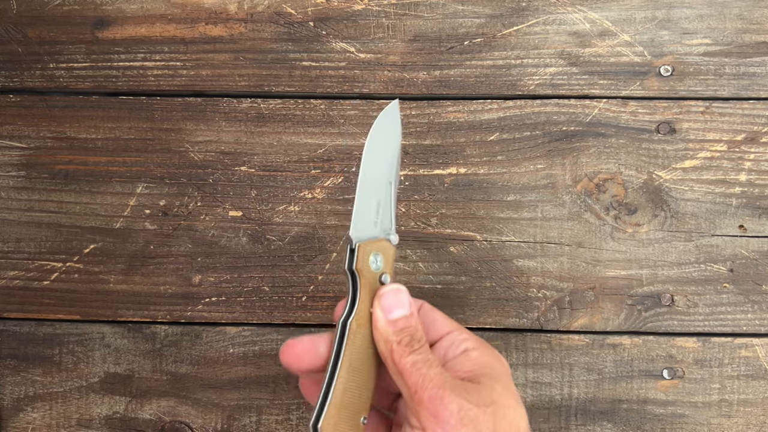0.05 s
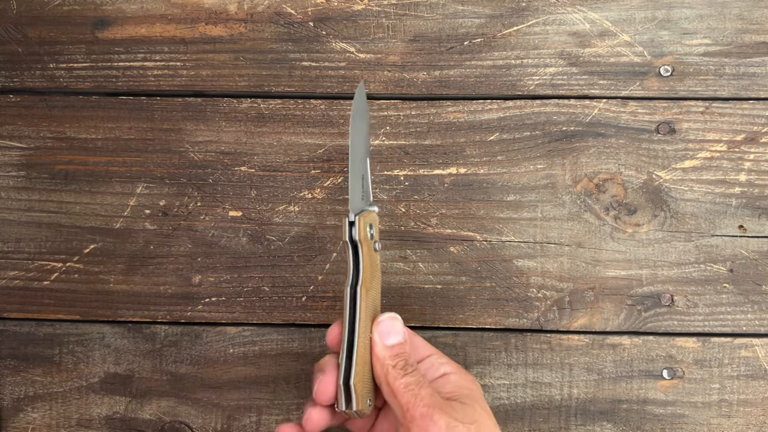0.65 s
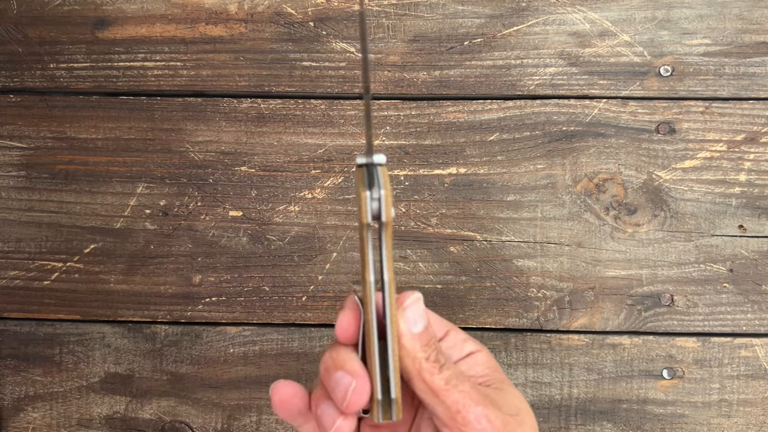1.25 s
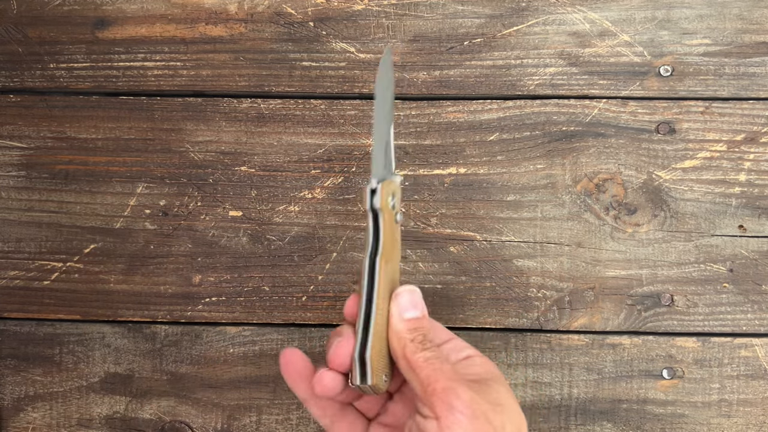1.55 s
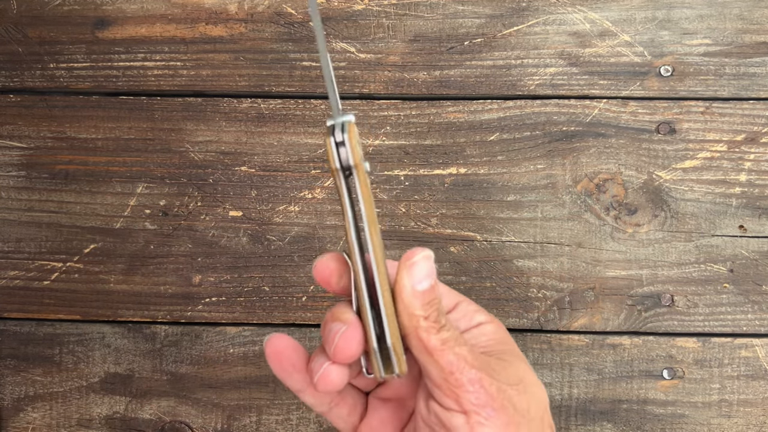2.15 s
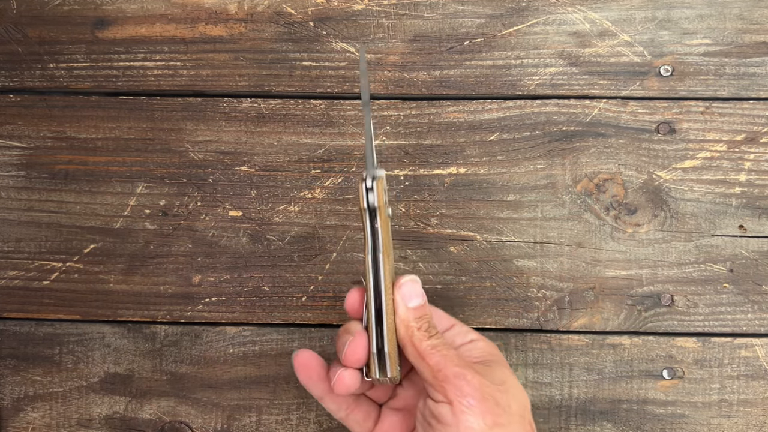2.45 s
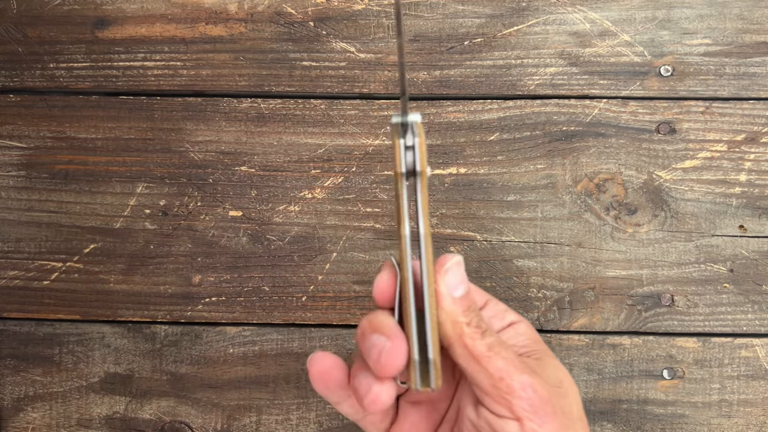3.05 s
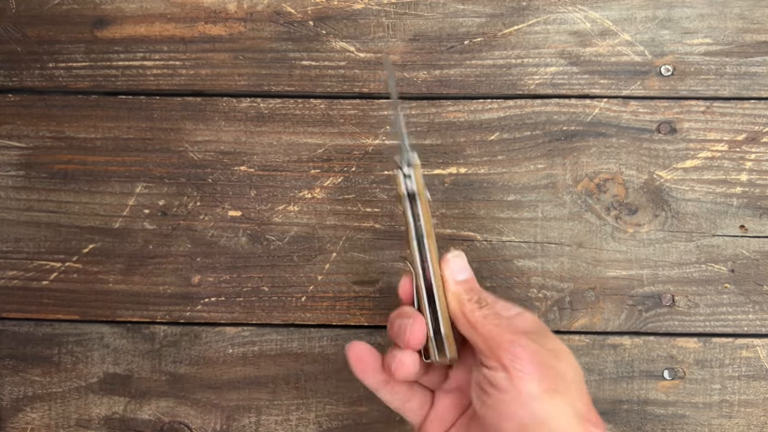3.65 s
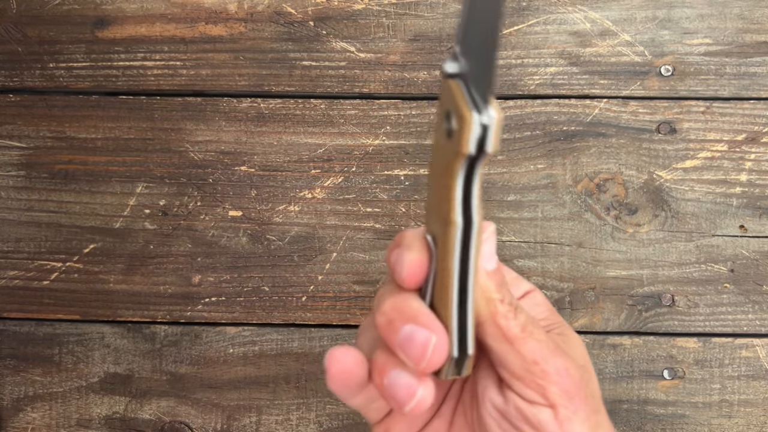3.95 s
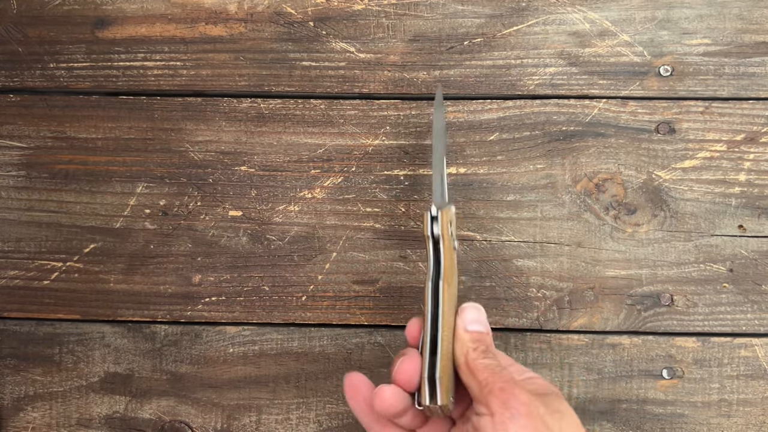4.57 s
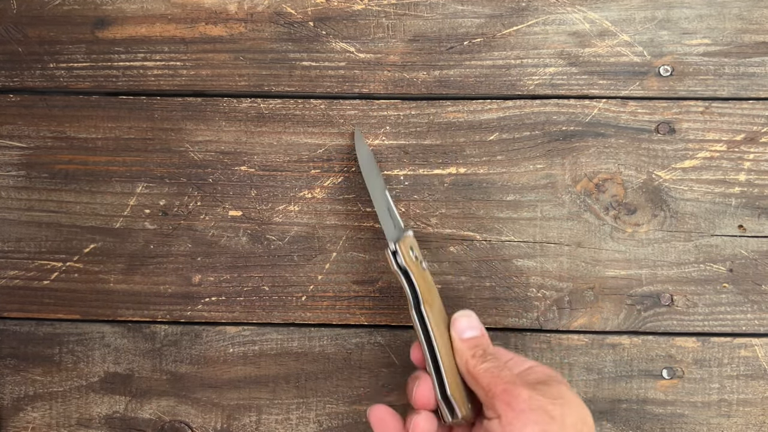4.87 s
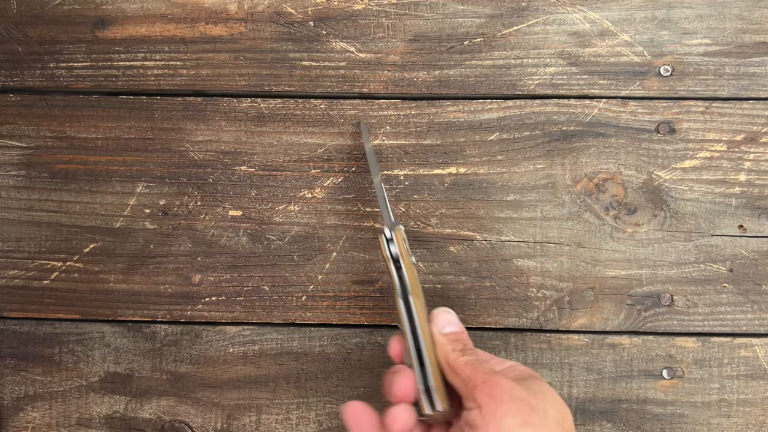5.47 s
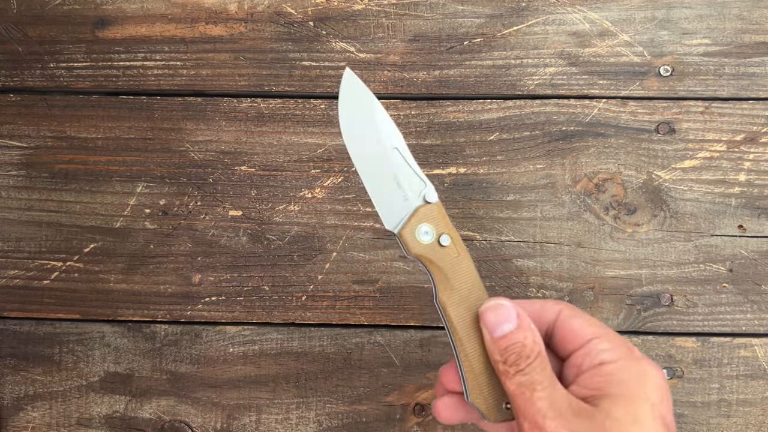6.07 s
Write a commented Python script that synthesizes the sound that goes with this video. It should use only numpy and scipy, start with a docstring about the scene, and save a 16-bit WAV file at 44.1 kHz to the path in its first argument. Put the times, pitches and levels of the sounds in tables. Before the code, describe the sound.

The metal spine of a folding knife is knocked against a wooden plank table, close to the microphone in a small, live room. After a second of faint finger movement on the handle, thirteen sharp knocks follow, about two a second and quickening near the end. Each cracks and briefly rings in wood and metal, and some bounce. A very faint hum lies underneath.

```python
"""The spine of a folding knife knocked on a plank table, close to the microphone in a small, live room.
Each blow cracks and sets planks and knife ringing, and some bounce. The microphone input clips for the
first milliseconds, then the room rings out. Underneath lie room tone and a faint hum. Fingers shift on
the handle early on, and three times the hand stops close enough to push air onto the microphone."""
import sys
import numpy as np
from scipy import signal
from scipy.fft import rfft, irfft
from scipy.io import wavfile

SR = 44100
rng = np.random.default_rng(int(sys.argv[2]) if len(sys.argv) > 2 else 0)


def put_to_file(sound):
    """Save the sound as 16-bit audio at rate SR, in the file named by the first command-line argument."""
    columns = np.atleast_2d(sound).T  # one column per channel
    safe = np.clip(columns, -1, 1)
    whole_steps = np.round(safe * 32767)
    wavfile.write(sys.argv[1], SR, whole_steps.astype(np.int16))


N = 278403

# modes of table and knife: pitch_hz, t60_s, gain_at_place_0_db, gain_at_place_1_db, room_share_db
MODES = [(168.7, 0.051, -25, -16, 13), (243, .35, -36.5, -37.5, 24), (373.7, 0.13, -18, -23, 24.5),
         (441, 0.074, -11, -32.5, 11), (541.2, 0.067, -10, -16.5, 7), (591.2, 0.11, -10, -27.5, 25.5),
         (621, 0.37, -27.5, -30.5, 44), (818.6, 0.053, -20.5, -20.5, 7.5), (925, 0.06, -12, -16, 4),
         (954, 0.027, -31, -30.5, 31), (1133, 0.032, -23, -6.5, 14.5), (1311, 0.074, -16.5, -12.5, 21),
         (1408, 0.073, -23, -18.5, 33.5), (1390, 0.2, -13, -19.5, 12.5), (1490, 0.12, -25, -25.5, 33),
         (1380, 0.13, -23.5, -17.5, 15.5), (1890, 0.037, -5.5, -8.5, 6), (1840, 0.033, -17.5, -14.5, 21),
         (1900, 0.2, -10, -9, 7.5), (1983, 0.069, -16.5, -22, 30.5), (2110, 0.045, -13.5, -15.5, 18),
         (2352, 0.061, -14, -13, -2.5), (2435, 0.015, -8.5, -14, 1), (2538, 0.088, -10, -7, 14.5),
         (2740, 0.014, -15.5, -9.5, 5), (3015, 0.05, 4, -12.5, -2), (3017, 0.052, 5, -20, 10),
         (3508, 0.16, -19.5, -15, 13.5), (3540, 0.02, -16, -3.5, 4), (3835, 0.057, -15.5, -8, 10.5),
         (4200, 0.27, -38, -25, 19), (4370, 0.18, -10, -55, 12), (4830, 0.07, -32, -33.5, 31.5),
         (7100, 0.047, -36.5, -36, 44.5)]


def undb(db):
    """Decibels to gain."""
    return 10 ** (np.asarray(db) / 20)


def level(x, db):
    """Scale to an rms level."""
    return x * undb(db) / np.sqrt(np.mean(x ** 2))


def colour(x, gain_at):
    """Filter with a gain given as a function of octaves (log2 Hz)."""
    hz = np.maximum(np.fft.rfftfreq(len(x), 1 / SR), 1)
    return irfft(rfft(x) * gain_at(np.log2(hz)), len(x))


def add(track, sound, start_s):
    """Mix a sound into a track, dropping what falls outside it."""
    start = int(round(start_s * SR))
    lo, hi = max(start, 0), min(start + len(sound), len(track))
    if hi > lo:
        track[lo:hi] += sound[lo - start:hi - start]


def fading_noise(table, noise):
    """Dense resonances: overlapping bands of a noise, each with its own level and decay."""
    hz, db, t60 = np.transpose(table)
    t = np.arange(len(noise)) / SR
    shaped = colour(noise, lambda o: undb(np.interp(o, np.log2(hz), db)))
    bands = (colour(shaped, lambda o: np.interp(o, np.log2(hz), peak)) for peak in np.eye(len(hz)))
    return sum(band * np.exp(-np.log(1000) * t / decay) for band, decay in zip(bands, t60))


def contacts(blow_room_db=0.73, bounce_room_db=-2, bounce_slip=0.24):
    """Blows, then bounces a little further along the spine: start_s, force_db, place, room_share_db."""
    # the spine striking the table: start_s, force_db, place (of contact, 0-1)
    blows = [(-.135, -6, 0.95), (1.0536, -0.5, 0.84), (1.4997, -5.5, 0.62), (1.9242, 2.5, 0.33),
             (2.4336, -1, 0.4), (2.8341, 2, 0.22), (3.321, 3, 0.21), (3.7396, 1.5, 0.17), (4.1381, 2, 0.06),
             (4.5325, -4, 0.82), (4.8888, -6.5, 0.7), (5.2106, 1.5, 0.81), (5.4970, 1.5, 0.69),
             (5.7088, -.5, 0.65)]
    # the blade falling back after some blows: start_s, force_db
    bounces = [(1.0755, -11), (2.8518, -12.5), (3.7560, -12.5), (4.1554, -13), (4.5703, -15), (4.916, -17),
               (5.5156, -13)]
    rows = [(start_s, force_db, place, blow_room_db) for start_s, force_db, place in blows]
    for start_s, force_db in bounces:
        last_place = [place for blow_s, _, place in blows if blow_s < start_s][-1]
        rows.append((start_s, force_db, min(last_place + bounce_slip, 1), bounce_room_db))
    return rows


def mode_gains(place, scatter_db=2.0):
    """How strongly each mode answers depends on where the spine lands."""
    _, _, place_0_db, place_1_db, _ = np.transpose(MODES)
    gain_db = place_0_db + place * (place_1_db - place_0_db)
    return undb(gain_db + scatter_db * rng.standard_normal(len(MODES)))


def grain(end_noises, place, fresh_share=0.79):
    """Fine structure of a response: partly set by the place of contact, mostly new at each blow."""
    angle = place * np.pi / 2
    of_place = np.cos(angle) * end_noises[0] + np.sin(angle) * end_noises[1]
    fresh = rng.standard_normal(len(of_place))
    return np.sqrt(1 - fresh_share) * of_place + np.sqrt(fresh_share) * fresh


def hardness(sound, force_db, pivot_hz=2000):
    """A stronger contact is harder and shorter, and so brighter."""
    tilt_db_per_octave = 0.08 + 0.1247 * force_db
    padded = np.pad(sound, (0, len(sound)))
    tilted = colour(padded, lambda o: undb(tilt_db_per_octave * np.clip(o - np.log2(pivot_hz), -2, 2)))
    return tilted[:len(sound)]


def blow(gains, noise, detune=0.0016, ring_db=2.5):
    """One contact heard close up: a short crack and the ringing modes, which the grip detunes a little."""
    # crack of the many damped modes between the ringing ones: band_hz, gain_db, t60_s
    crack_bands = [(50, -3.5, 0.023), (198, 0, 0.0077), (457, 5.5, 0.017), (860, 10, 0.036),
                   (1560, 12, 0.045), (3420, 18, 0.035), (4180, 14.5, 0.021), (6650, 6.5, 0.016),
                   (9900, 0.5, 0.021), (16100, -10, 0.024)]
    t = np.arange(len(noise)) / SR
    hz, t60, *_ = np.transpose(MODES)
    hz = hz * (1 + detune * rng.standard_normal(len(hz)))
    rings = np.cos(2 * np.pi * np.outer(hz, t)) * np.exp(-np.log(1000) * t / t60[:, None])
    return undb(ring_db) * gains @ rings + fading_noise(crack_bands, noise)


def room(gains, noise, ripple_db, cluster_hz=18, build_s=0.013, far_wall_s=0.022, linger_s=0.2):
    """The room returns a blow from all directions: a wash with a peak at every mode."""
    # reverberation of the small room: band_hz, gain_db, t60_s
    reverb_bands = [(58.5, -10.5, 0.23), (175, -11, 0.29), (352, -6, 0.3), (710, -9.5, 0.32),
                    (1150, -3.5, 0.29), (1890, -2, 0.32), (3640, -0.5, 0.3), (4470, -9, 0.31),
                    (6320, -14, 0.29), (7600, -26, 0.3), (12000, -28.5, 0.15), (16000, -38.5, .17)]
    t = np.arange(len(noise)) / SR
    hz, t60, _, _, room_share_db = np.transpose(MODES)
    # the planks couple, which spreads each mode's energy over a small cluster
    own_width = np.log(1000) / (2 * np.pi * t60)
    half_width = np.hypot(own_width, cluster_hz)
    power = (undb(room_share_db) * gains) ** 2 * own_width / half_width

    def resonances(octave):
        f = 2 ** octave
        peaks = (1 / (1 + ((f[:, None] - hz) / half_width) ** 2)) @ power
        # countless weak modes ripple the treble
        fine_db = np.interp(f, np.linspace(0, SR / 2, len(ripple_db)), ripple_db)
        return np.sqrt(1 + peaks) * undb(fine_db * np.minimum(f / 4000, 1))

    # the wash builds up quickly and swells again when the far walls answer
    swell = (1 - np.exp(-(t / build_s) ** 2)) * np.where(t < far_wall_s, undb(-3), 1)
    # the last reflections, between the hardest walls, die more slowly
    linger = np.sqrt(1 + (t / linger_s) ** 4)
    return fading_noise(reverb_bands, colour(noise, resonances)) * swell * linger


def knife_knocks():
    """Every contact reaches the microphone directly, off nearby surfaces and through the room."""
    # first reflections from nearby surfaces: delay_s, gain_db
    reflections = [(.0045, -17), (.0078, -21.5)]
    out = np.zeros(N)
    crack_ends = rng.standard_normal((2, 8192))  # one noise for place 0, one for place 1
    room_ends = rng.standard_normal((2, 24576))
    ripple_db = rng.standard_normal(400)
    polarity = rng.choice([-1, 1], len(MODES))
    for start_s, force_db, place, room_share_db in contacts():
        gains = polarity * mode_gains(place)
        strike = blow(gains, grain(crack_ends, place))
        direct = undb(force_db) * hardness(strike, force_db)
        add(out, direct, start_s)
        for delay_s, gain_db in reflections:
            add(out, undb(gain_db) * direct, start_s + delay_s)
        wash = room(gains, grain(room_ends, place), ripple_db)
        add(out, undb(force_db + room_share_db) * hardness(wash, force_db), start_s)
    return out


def room_tone():
    """The steady air of the room, mostly low rumble."""
    # spectrum of the room tone: frequency_hz, gain_db
    spectrum = [(20, -20.5), (50, -33), (100, -44.5), (200, -49), (320, -52), (500, -59), (1000, -67),
                (2200, -64.5), (4000, -71), (8000, -78.5), (16000, -85)]
    hz, db = np.transpose(spectrum)
    return colour(rng.standard_normal(N), lambda o: undb(np.interp(o, np.log2(hz), db)))


def hum(pitch_hz=236.4, level_db=-66, waver_hz=0.43):
    """Something in the room hums faintly, its pitch wavering a little."""
    slow_noise = colour(rng.standard_normal(N), lambda o: 1. * (o < np.log2(20)))
    hz = pitch_hz + waver_hz * level(slow_noise, 0)
    return level(np.sin(2 * np.pi * np.cumsum(hz) / SR), level_db)


def fingers(size=8192):
    """Skin slips on the handle: brief hisses and a tick, which start faster than they fade."""
    # fingers shifting their grip: peak_s, level_db, centre_hz
    slips = [(.275, -61, 2200), (.348, -66, 5500), (.524, -63, 5500), (.634, -61, 6000)]
    # the thin tick that ends the last slip: peak_s, level_db, centre_hz
    ticks = [(.66, -46, 6660)]
    slip_octaves, slip_fade_s = 1.1, .018
    tick_octaves, tick_fade_s = 0.2, .0017
    out = np.zeros(N)
    t = (np.arange(size) - size / 2) / SR
    for events, width, fade_s in (slips, slip_octaves, slip_fade_s), (ticks, tick_octaves, tick_fade_s):
        envelope = np.exp(-np.maximum(t, -2 * t) / fade_s)
        for peak_s, level_db, centre_hz in events:
            noise = rng.standard_normal(size)
            hiss = colour(noise, lambda o: np.exp(-((o - np.log2(centre_hz)) / width) ** 2 / 2))
            add(out, level(hiss, level_db) * envelope, peak_s + t[0])
    return out


def air_puffs(rise_s=.016, settle_ratio=4):
    """A low thump of air as the hand stops, then the overloaded microphone input slowly settles."""
    # air pushed by the hand stopping close to the microphone: start_s, gain_db
    puffs = [(3.319, 4.5), (3.741, -12), (5.497, -15)]
    out = np.zeros(N)
    for start_s, gain_db in puffs:
        age = np.maximum(np.arange(N) / SR - start_s, 0) / rise_s
        thump = -age * np.exp(-age)
        settling = age * np.exp(-age / settle_ratio) / settle_ratio ** 2
        out += undb(gain_db) * (thump + settling)
    return out


def scene():
    """Knife, hand and room at one microphone close to the table."""
    return (knife_knocks() + fingers() + air_puffs() + room_tone() + hum())[None]


def record(dry, clip_level=.96, knee=10, soft_top_hz=15000, cutoff_hz=16000):
    """The microphone input clips with a narrow knee; the top is softened, then cut."""
    clipped = clip_level * dry / (1 + np.abs(dry) ** knee) ** (1 / knee)
    softened = colour(clipped[0], lambda o: 1 / np.sqrt(1 + (2 ** o / soft_top_hz) ** 4))
    lowpass = signal.firwin(255, cutoff_hz, fs=SR)
    return signal.fftconvolve(softened, lowpass, mode="same")[None]


dry = scene()
out = record(dry)
put_to_file(out)
```